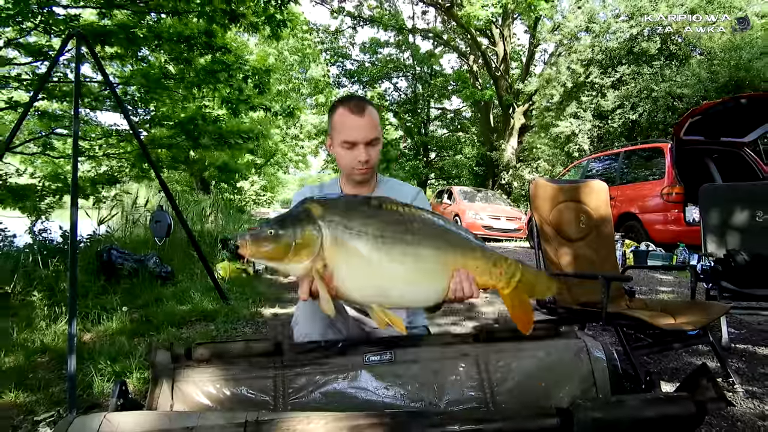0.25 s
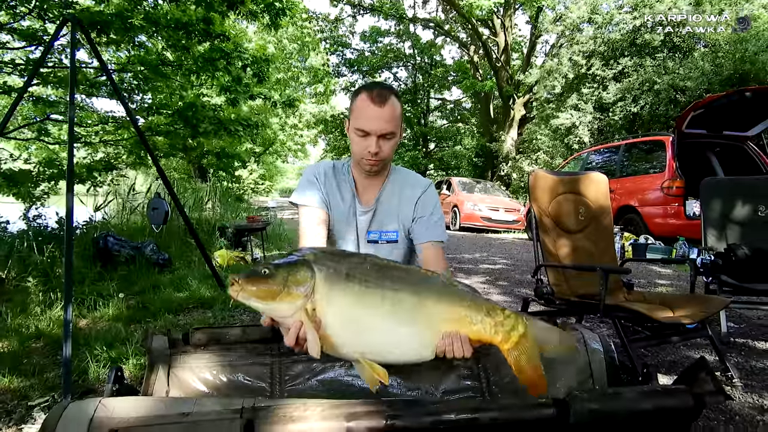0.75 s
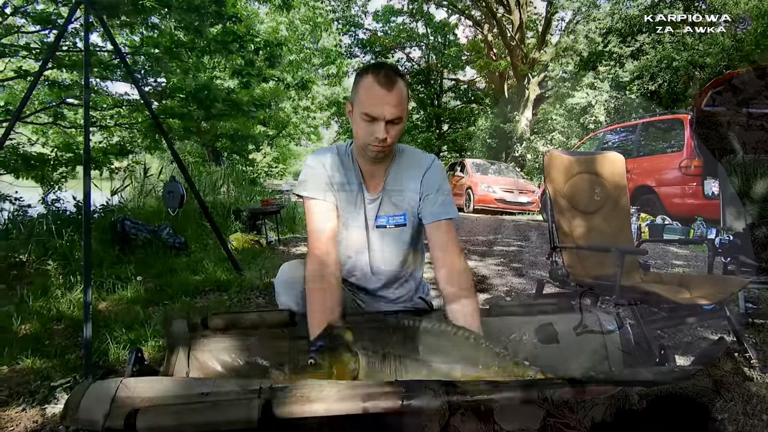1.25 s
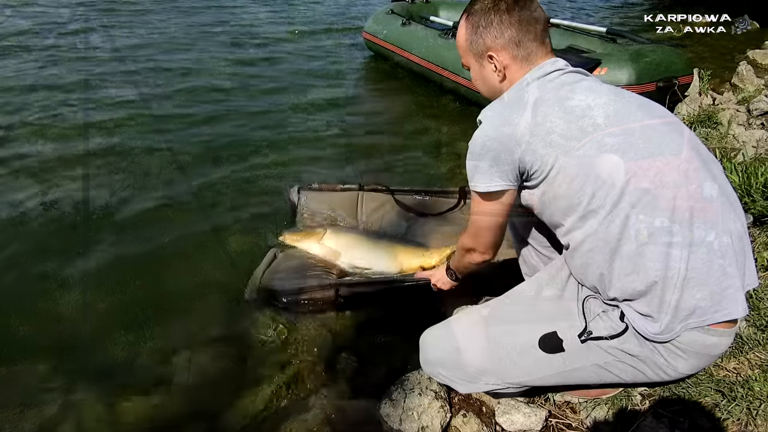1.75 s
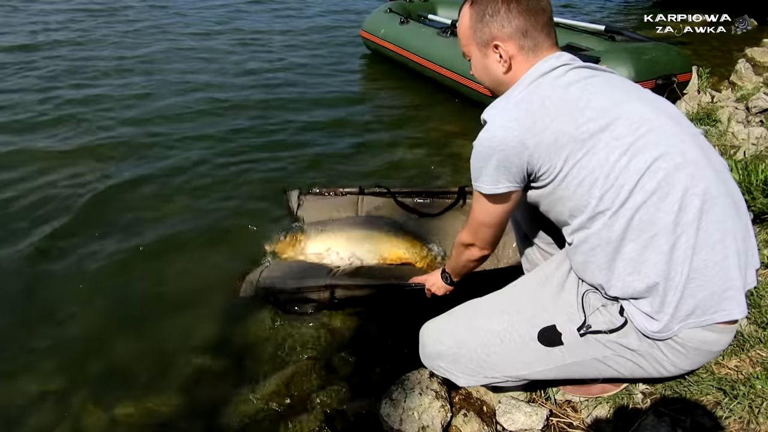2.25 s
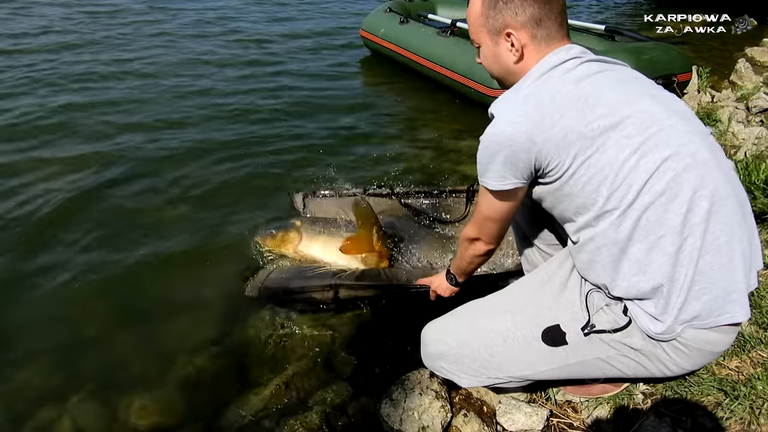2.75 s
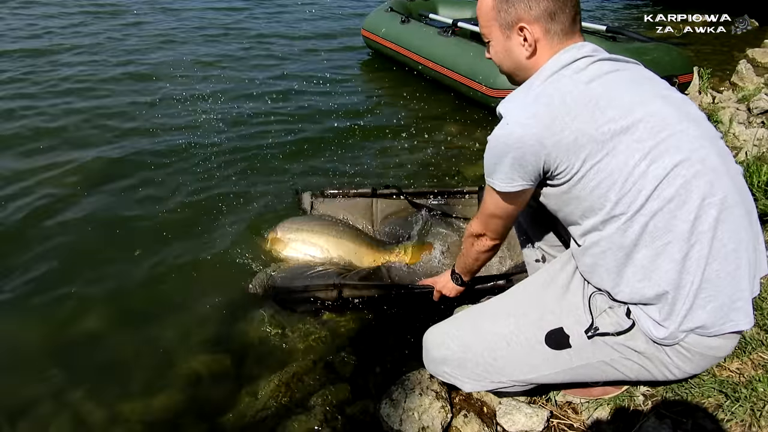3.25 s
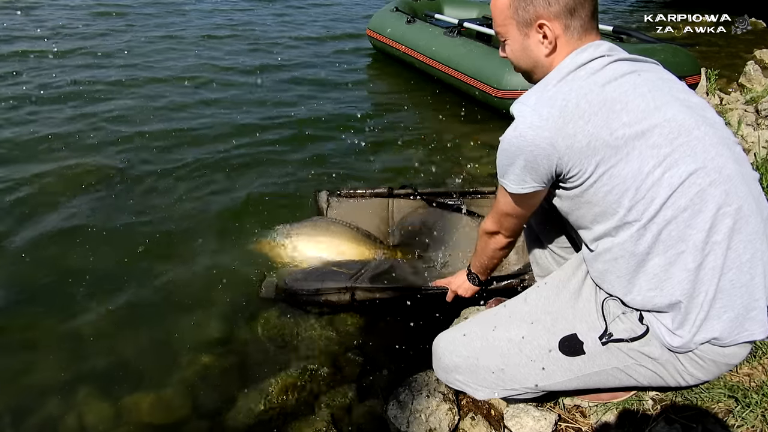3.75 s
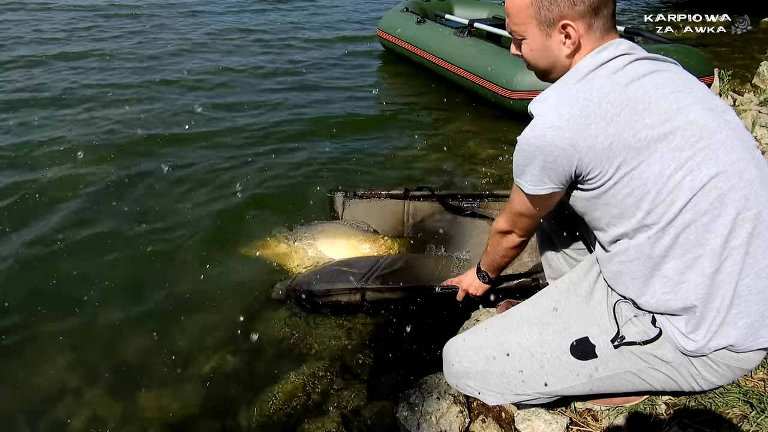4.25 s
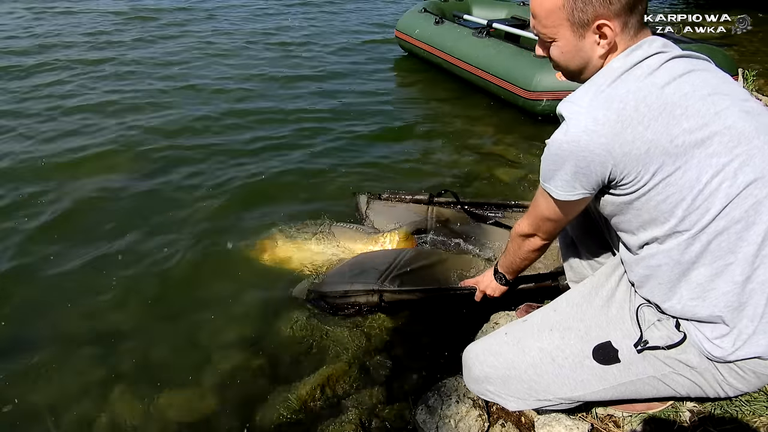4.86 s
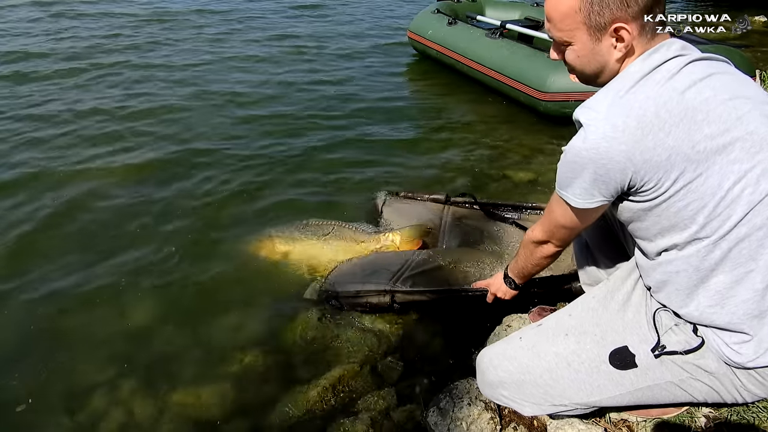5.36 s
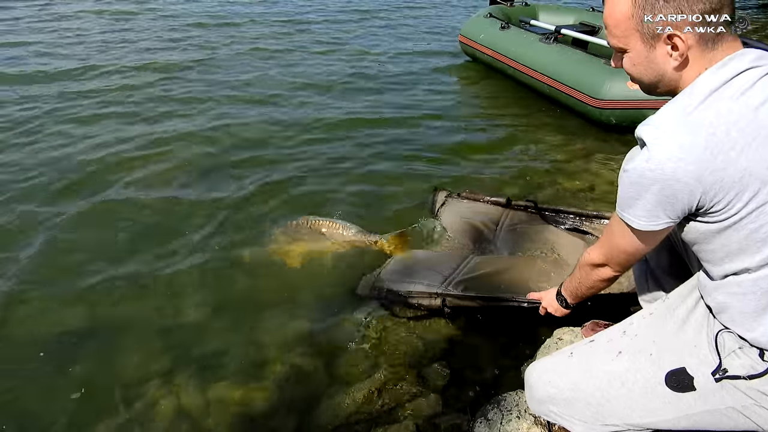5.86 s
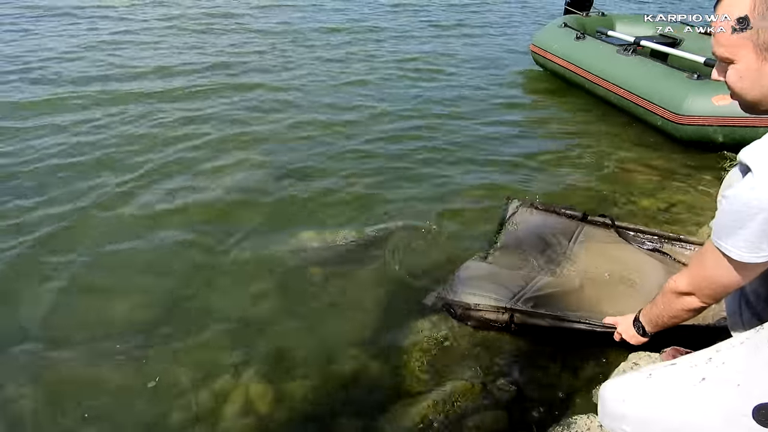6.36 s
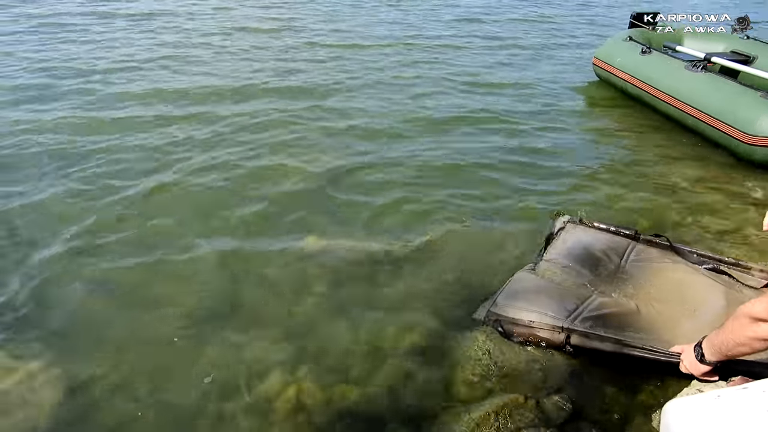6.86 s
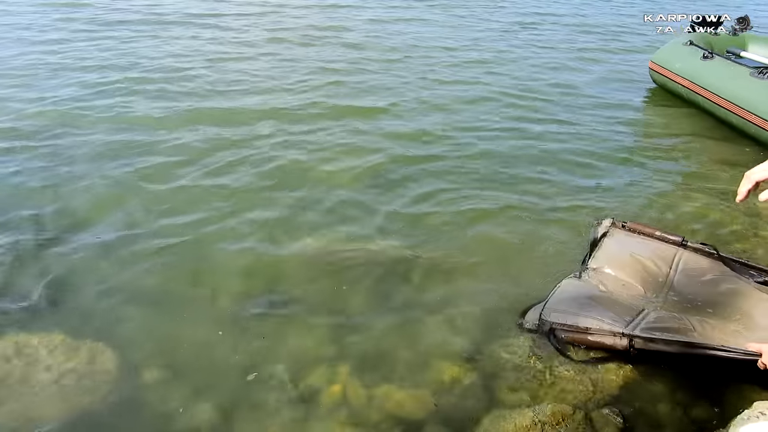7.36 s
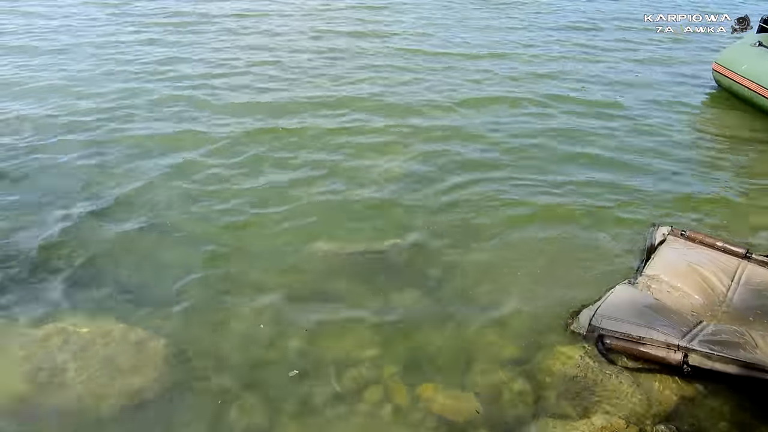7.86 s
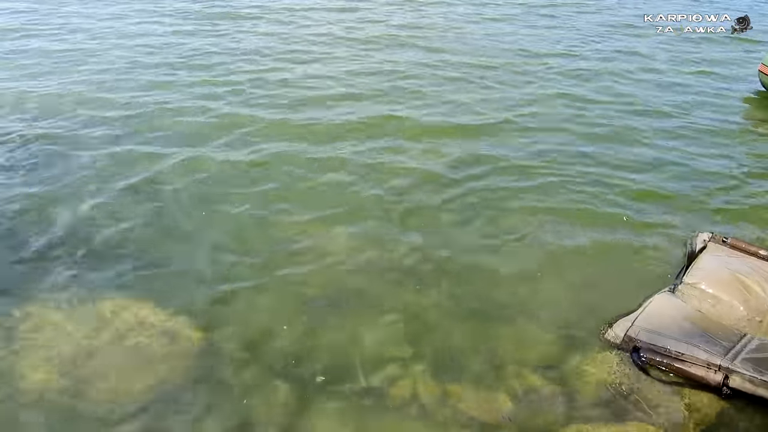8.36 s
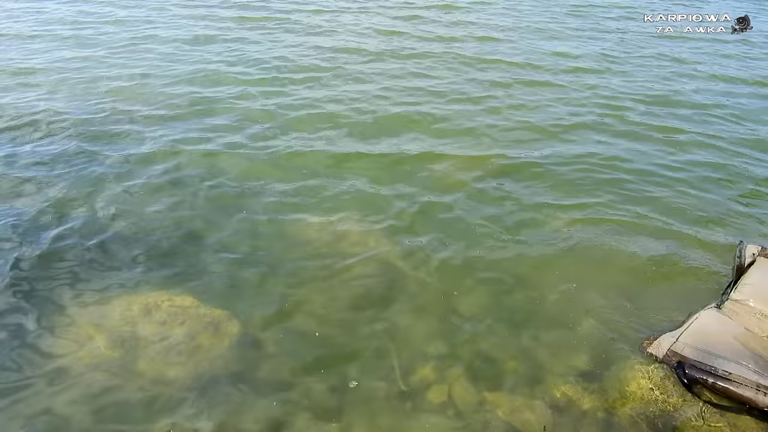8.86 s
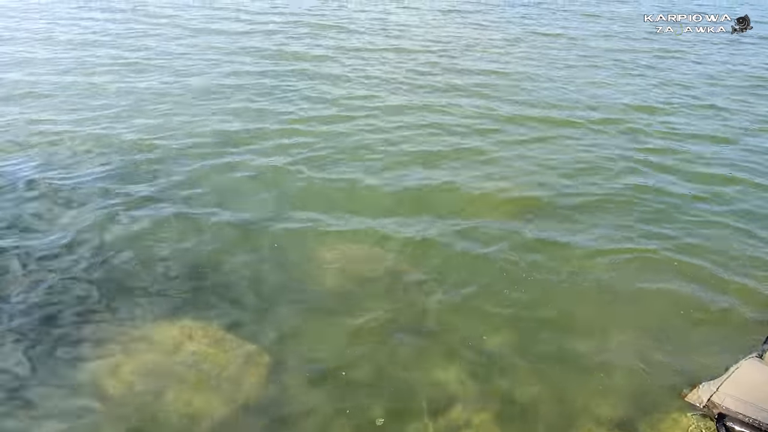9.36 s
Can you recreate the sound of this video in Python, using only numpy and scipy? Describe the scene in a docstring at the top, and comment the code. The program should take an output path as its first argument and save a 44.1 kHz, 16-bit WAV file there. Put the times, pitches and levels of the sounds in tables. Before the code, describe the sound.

Close stereo sound at a leafy lake bank. First come low thuds of handling, faint bird whistles and a distant hum; then hard damped knocks and wet fabric swishing with tiny crackles. A short violent splash follows, sharp slaps over fizzing spray and hollow bubbles, then smaller showers and ticking drops. The water settles; steady soft hiss remains, with occasional dull bumps and a lively run of birdsong toward the end.

```python
"""Soft bumps of a hand-held microphone and a far motor's hum open the scene, among breeze and hissing leaves.
Close by at the edge of a lake, a big carp is lowered onto a wet padded cradle: noise-like grains make the fabric,
ringing modes the frame. It then thrashes in a floating sling: showers of short rising tones make spray, bubbles
and falling drops, and filtered noise the heaved water. Small birds, gliding sines with echoes, whistle in the
trees as it swims off."""
import sys
import numpy as np
from scipy import signal
from scipy.fft import irfft
from scipy.io import wavfile
from scipy.ndimage import uniform_filter1d, map_coordinates

SR = 44100
rng = np.random.default_rng(int(sys.argv[2]) if len(sys.argv) > 2 else 0)


def master(y):
    """Save y as 16-bit WAV."""
    cut = np.clip(np.atleast_2d(y).T, -1, 1)
    pcm = np.round(cut * 32767)  # scale
    wavfile.write(sys.argv[1], SR, pcm.astype(np.int16))


N = 423390
TIME = np.arange(N) / SR
CUTOFF_HZ = 15300   # top of the microphone's sound


def from_db(db):
    """Decibels to gain."""
    return 10 ** (np.asarray(db) / 20)


def rms_one(x):
    """Scale to rms 1."""
    return x / np.sqrt(np.mean(x ** 2) + 1e-20)


def at_hz(points, hz):
    """Read a spectrum on a log-frequency axis."""
    point_hz, value = np.transpose(points)
    return np.interp(np.log(hz), np.log(point_hz), value)


def drift(rate):
    """Smooth random wandering of rms 1, with a new target so many times a second."""
    knots = rng.standard_normal(int(N / SR * rate) + 2)
    return rms_one(np.interp(TIME * rate, np.arange(len(knots)), knots))


def swell(s, half):
    """A rounded rise and fall about one moment, down to 0.35 of its peak at half seconds either side."""
    bell = 1 / (1 + ((TIME - s) / half) ** 2)
    return bell ** 1.5


def together(rows, times):
    """Joint level of (start s, length s, dB) events that build up, hold and settle, exponentially at both ends."""
    t = TIME[::16]
    build_s, settle_s = times
    power = 0
    for start, length, db in rows:
        before = np.maximum(start - t, 0) / build_s
        after = np.maximum(t - start - length, 0) / settle_s
        power = power + from_db(2 * db) * np.exp(-2 * (before + after))
    return np.interp(TIME, t, np.sqrt(power + 1e-18))


# Left-right likeness of the noises. Each row: frequency in Hz, correlation from -1 to 1.
LIKENESS = [(60, 0.77), (150, 0.74), (380, 0.86), (950, 0.75), (2380, 0.55), (5980, -0.025), (15000, -0.69)]


def noise(spectrum):
    """Stereo noise of a given colour, alike at both ears in the bass and opposed at the top; rms 1."""
    hz = np.maximum(np.arange(N // 2 + 1) * SR / N, 1)
    mid, side = rng.standard_normal((2, len(hz))) + 1j * rng.standard_normal((2, len(hz)))
    alike = np.clip(at_hz(LIKENESS, hz), -.99, .99)
    ears = np.sqrt(1 + alike) * mid + np.sqrt(1 - alike) * side * [[1], [-1]]
    bass_cut = hz / np.hypot(hz, 20)
    return rms_one(irfft(ears * from_db(at_hz(spectrum, hz)) * bass_cut, N))


def pings(s, db, hz, cycles, pan_db, rise, skew, size, softness=1.4):
    """Short tones that swell for some cycles, then die, gliding up by rise; skew scales the phase between the ears."""
    step = np.arange(size)
    at = (np.maximum(s * SR, 0).astype(int)[:, None] + step).ravel()
    start = rng.random(len(s))
    apart = skew * np.sqrt(3) * rng.uniform(-0.75, 1, len(s))
    columns = np.float32([from_db(db), from_db(pan_db / 2), hz, cycles, start, apart])
    gain, lean, hz, cycles, start, apart = columns[:, :, None]
    turns = hz * np.float32(step / SR)
    age = turns / cycles   # 1 at the peak
    shape = gain * (age * np.exp(1 - np.minimum(age, 20))) ** softness
    phase = 2 * np.pi * (turns * (1 + rise * np.minimum(age, 6) / 2) + start)
    ears = []
    for ear in (1, -1):
        tones = shape * lean ** ear * np.sin(phase + ear * apart / 2)
        ears.append(np.bincount(at, tones.ravel(), N)[:N])
    return np.array(ears)


CLUMP_WIDTH_HZ, CLUMPS_PER_S = 330, 30   # grains bunch in pitch and in time


def grains(span, spectrum, per_s, cycles, spread_db, clump_db, skew, size):
    """A shower of pings of random pitch and size, bunched into clumps, over a span of time; evened to near 1."""
    start, end = span
    when, pitch, big, length, place = rng.random((int(per_s * (end - start)), 5)).T
    low, high = spectrum[0][0], min(spectrum[-1][0], CUTOFF_HZ)
    s = start + when * (end - start)
    hz = low + (high - low) * pitch
    clump_map = rng.standard_normal(size=(400, 40))
    clump_at = [(s - start) * CLUMPS_PER_S, hz / CLUMP_WIDTH_HZ]
    clumps = map_coordinates(clump_map, clump_at, order=1, mode="mirror")
    db = at_hz(spectrum, hz) + spread_db * np.minimum(-np.log(1 - big), 4.5) + clump_db * clumps
    x = pings(s, db, hz, cycles * 2 ** (2 * length - 1), 8 * (place - .5), 0.016, skew, size)
    power = np.abs(uniform_filter1d(np.mean(x ** 2, axis=0), size=1800))
    return x / np.sqrt(power + .03 * power.mean())


def scatter(x, t60, build_s):
    """Many faint echoes, different at each ear, that build up and die away by 60 dB in t60 seconds."""
    t = np.arange(SR) / SR
    echoes = rng.standard_normal((2, SR)) * from_db(-60 * t / t60) * (1 - np.exp(-t / build_s))
    echoes /= np.sqrt(np.sum(echoes ** 2, axis=1, keepdims=True))
    return signal.fftconvolve(np.atleast_2d(x), echoes, axes=1)[:, :N]


# Far motor. Each row: time in seconds, level in dB.
MOTOR_LEVEL = [(0, -51), (.8, -50.5), (1.2, -40.5), (1.6, -42.5), (1.83, -46.5), (2.0, -74)]
MOTOR_HZ = 123.7   # mean pitch


def motor():
    """A far motor hums as one sine, wavering in pitch and strength."""
    s, db = np.transpose(MOTOR_LEVEL)
    level_db = np.interp(TIME, [s[0] - .05, *s, s[-1] + .05], [-120, *db, -120])
    throb = 1 + 0.42 * np.tanh(drift(34.5))
    hz = MOTOR_HZ * (1 + 0.021 * drift(40.9))
    return from_db(level_db) * throb * np.sin(2 * np.pi * np.cumsum(hz) / SR)


# Colours of the open air and of the leaves. Each row: frequency in Hz, relative level in dB.
SHORE_COLOUR = [(41, -55.5), (70, -28), (96, -27), (110, -4), (128, 3.5), (161, 1.5), (199, 4), (246, -4),
                (353, -0.5), (471, -6), (988, -5), (1110, -6.5), (1320, -6.5), (2270, -12), (2600, -19),
                (3380, -26), (5720, -120)]
LEAF_COLOUR = [(1500, -22), (2500, -2), (3300, 0.5), (3900, -3.5), (4500, 0.5), (6000, -1.5), (7500, -1.5),
               (9000, 2), (9800, -3), (11000, -10.5), (12500, -15), (14000, -31), (15300, -47)]
TO_SHORE = (1.9, 2.7)   # seconds over which the background under the trees fades into that of the open shore
AIR_DB, RUSTLE_DB = (-49.5, -52.5), (-53, -56)   # under the trees, then at the shore


def shore_and_leaves():
    """The wash of the shore and the hiss of leaves, two steady coloured noises."""
    air, rustle = (from_db(np.interp(TIME, TO_SHORE, db)) for db in (AIR_DB, RUSTLE_DB))
    return air * noise(SHORE_COLOUR) + rustle * noise(LEAF_COLOUR)


# Colour of the breeze. Each row: frequency in Hz, relative level in dB.
BREEZE_COLOUR = [(10, -39), (22, -26.5), (40, -12), (58, -2.5), (100, -2.5), (160, -6), (300, -16),
                 (600, -37), (2000, -69)]
# Low rumbles on the microphone, from gusts and from a handling bump at the start.
# Each row: start in seconds, length in seconds, level in dB before the flutter.
RUMBLES = [(0, 0.013, -36.5), (.86, 0.94, -47), (2.1, 0.49, -56), (4.02, 0.52, -61), (8.85, 0.72, -55)]
RUMBLE_TIMES, CALM_DB = (0.04, 0.07), -70.5   # time constants (build s, settle s); level between rumbles


def breeze():
    """Breeze on the microphone, a low fluttering noise that grows in gusts and with a handling bump at the start."""
    level = together(RUMBLES, RUMBLE_TIMES) + from_db(CALM_DB)
    flutter = from_db(3.9 * drift(22))
    return level * flutter * noise(BREEZE_COLOUR) * from_db([[1.5], [-1.5]])


# Bands of noise from high lisps to a faint drone. Each row: time of the peak in seconds, level in dB,
# centre in Hz, width of each filter pass in Hz, half length in seconds.
LISPS = [(0.213, -56, 2560, 447, 0.23), (0.589, -39, 8470, 1100, .014), (1.78, -42, 2700, 900, 0.023),
         (2.062, -49.5, 1620, 260, 0.06), (4.1, -59, 449, 35.2, 0.39), (6.044, -47, 7300, 2000, 0.017),
         (7.49, -44.5, 9150, 4200, 0.011), (8.844, -35, 7400, 1990, 0.003),
         (8.875, -41.5, 7840, 1940, 0.041)]


def lisps():
    """Soft narrow bands of filtered noise that rise and fall."""
    out, white = 0, rng.standard_normal((2, N))
    for s, db, hz, width_hz, half in LISPS:
        band = signal.butter(2, [hz - width_hz / 2, hz + width_hz / 2], "band", fs=SR, output="sos")
        hiss = rms_one(signal.sosfilt(np.vstack([band, band]), white))
        out = out + from_db(db) * swell(s, half) * hiss
    mid, side = out
    return mid + .5 * side * np.array([[1], [-1]])


# Birdsong in the trees. Each row: start in seconds, length in seconds, first pitch in Hz, last pitch in Hz,
# arch of the glide in Hz, trill span in Hz, relative level in dB.
SONG = [(.02, 0.28, 2590, 2550, -70.5, 12, -60.5), (.36, .19, 2520, 2644, -89, 5, -61.5),
        (5.613, 0.1, 2840, 3210, -55, 260, -61), (5.858, 0.041, 5610, 5070, -2, 150, -51),
        (6.6, 0.054, 3060, 3340, 3, 240, -52.5), (6.681, 0.049, 4530, 4720, -7, 72, -41.5),
        (6.71, 0.057, 4890, 4885, 33, 230, -42), (6.814, 0.083, 4080, 3694, 7, 62, -43),
        (6.97, .061, 2890, 2480, -1, 60, -58.5), (7.201, 0.072, 3696, 3367, 16, 130, -40),
        (7.295, .12, 2666, 2996, 19, 20, -52.5), (7.513, 0.17, 2810, 2612, 0, 44, -52.5),
        (7.811, 0.043, 4380, 4250, 62, 170, -39.5), (7.828, 0.049, 3660, 3520, 15, 15, -42),
        (7.935, 0.0765, 3835, 3514, 59, 105, -38.5), (8.053, .04, 2570, 2760, 64, 30, -52.5),
        (8.104, 0.097, 3290, 3160, -3, 21, -43), (8.246, 0.027, 4870, 5150, 50, 160, -47),
        (8.25, .08, 4610, 4400, 35, 222, -40), (8.304, 0.044, 3680, 3530, 6, 130, -52),
        (8.384, 0.094, 3020, 3150, 28, 60, -50), (8.87, 0.045, 3160, 3260, -2, 0, -61),
        (9.033, 0.0081, 3370, 3600, 42, 0, -54)]
TRILL_PER_S = 130   # mean rate


def bird():
    """Whistles that glide along an arch, some with a fast trill; near trees smear them and far ones answer faintly."""
    song, waver = np.zeros(N), drift(330)
    trill = np.sin(2 * np.pi * np.cumsum(TRILL_PER_S * (1 + .15 * drift(30))) / SR)
    for s, length, first_hz, last_hz, arch_hz, trill_hz, db in SONG:
        u = np.linspace(0, 1, int(length * SR))
        at = max(int(s * SR), 0) + np.arange(len(u))
        arch = np.abs(np.sin(np.pi * u))
        glide = first_hz + (last_hz - first_hz) * u + arch_hz * arch
        hz = glide + .5 * trill_hz * trill[at] + (20 + 0.23 * trill_hz) * waver[at]
        song[at] += from_db(db + 6.0) * arch ** .5 * np.sin(2 * np.pi * np.cumsum(hz) / SR)
    near_trees = scatter(song, t60=0.29, build_s=0.01)
    far_trees = from_db(-16) * scatter(song, t60=0.66, build_s=0.041)
    mid, side = near_trees + far_trees
    return from_db(-8.0) * song + mid + .5 * side * np.array([[1], [-1]])


# Soft bumps of handling, at the microphone itself. Each row: time of the peak in seconds, peak in dB,
# pitch in Hz, cycles to the peak, left over right in dB.
BUMPS = [(.011, -19, 230, 2.17, 7), (0.0227, -23.5, 360, 1.8, 12), (.032, -11.5, 173, 1.68, 8),
         (.383, -33, 157, 3.8, 7), (0.46, -27, 192, 2.1, 12), (1.218, -31, 250, 1.2, 13),
         (1.314, -30, 373, 5.4, 16.5), (1.316, -27, 197, 2.06, 12), (1.597, -32.5, 490, 2, 10),
         (1.625, -36, 165, 1.7, 17), (1.677, -25.5, 320, 1.18, 8), (4.165, -42, 67, 2.5, 3),
         (4.355, -42, 452, 5.2, 4.5), (4.416, -42, 400, 3, 1), (4.514, -39, 147, 1.73, 1.5),
         (4.597, -44, 108, 1.3, 8), (5.107, -25, 201, 2.77, -2), (5.291, -37.5, 198, 4, 5),
         (5.927, -36, 176, 2.66, 1), (6.809, -39.5, 160, 4, 11), (7.077, -21.5, 171, 2.25, 3.5),
         (7.142, -25, 163, 2.1, 10), (9.094, -36, 760, 4.9, 9), (9.103, -37, 330, 2.12, 8.5)]


def bumps():
    """Dull thuds of a few cycles each, with a short rumbling tail."""
    s, db, hz, cycles, pan_db = np.transpose(BUMPS)
    thuds = pings(s - cycles / hz, db, hz, cycles, pan_db, rise=0, skew=1.0, size=5000, softness=9.0)
    return thuds + from_db(-4.0) * scatter(thuds, t60=0.17, build_s=0.003)


# Knocks on the cradle's frame. Each row: time in seconds, level in dB, dulling above 1200 Hz in dB per octave
# (a negative one brightens).
KNOCKS = [(0.2078, -22, 25), (0.595, -29.5, 16), (0.961, -24, 26), (1.054, -12, 1.5), (1.21, -28, 12),
          (1.5223, -25, 3), (1.55, -36, -3), (1.717, -44.5, -16.5)]
# Modes of the frame. Each row: frequency in Hz, relative level in dB, time to die by 60 dB in seconds.
FRAME_MODES = [(636, -17, 0.019), (830, -4.5, 0.022), (1023, -2.5, 0.046), (1260, -11.5, .04),
               (1670, -0.5, 0.017), (2230, -4, 0.019), (2520, -7, 0.023), (3160, -7, 0.011)]


def frame():
    """Each knock sets off the frame's damped modes and has its own dulling of the high ones."""
    s, db, dulling = np.transpose(KNOCKS)
    ring = np.zeros(N)
    for k, (hz, mode_db, t60) in enumerate(FRAME_MODES):
        blows = np.full(N, 1e-18)
        dull_db = -dulling * np.maximum(np.log2(hz / 1200), 0)
        blows[(s * SR).astype(int)] = from_db(db + mode_db + dull_db + rng.normal(0, 1.0, len(s)))
        r = from_db(-60 / (t60 * SR))   # decay per sample
        w = 2 * np.pi * hz / SR
        ring += (-1) ** k * signal.lfilter([0, np.sin(w)], [1, -2 * r * np.cos(w), r * r], blows)
    muffled = signal.sosfilt(signal.butter(4, 3400, fs=SR, output="sos"), ring)
    return muffled * from_db([[-2.5], [-9]])


# Colours of wet fabric, bright and dull. Each row: frequency in Hz, relative level in dB.
SWISH_COLOUR = [(1470, -38), (2500, -15), (2970, -12), (3200, -11), (3560, -9), (4200, -6.5), (4910, -1.5),
                (5700, -1.5), (6830, -1.5), (8880, 8.5), (15000, -42)]
CRUMPLE_COLOUR = [(180, -39), (300, -9), (381, -28), (634, -3), (967, 5), (3190, -2.5), (3470, -24),
                  (4000, -31), (5200, -55), (8800, -120)]
# The fish slides over the fabric or thuds down on it.
# Each row: start in seconds, length in seconds, swish in dB, crumple in dB.
FABRIC_CONTACTS = [(0.914, 0.02, -39.5, -56), (1.042, .008, -54, -44), (1.17, 0.04, -54, -49.5),
                   (1.306, 0.051, -41.5, -52), (1.376, 0.054, -43.5, -49.5), (1.534, 0.038, -39.5, -47),
                   (1.578, 0.074, -38, -53), (1.663, 0.023, -35, -49), (1.715, 0.0056, -43, -46),
                   (1.777, .015, -42, -49), (1.836, 0.1, -48, -51)]
CONTACT_TIMES = (0.024, 0.039)   # time constants (build s, settle s)
CONTACT_SPAN = (.75, 2.05)   # from s, to s


def fabric():
    """Wet fabric swishes and crumples under the fish, in dense showers of tiny grains."""
    start, length, swish_db, crumple_db = np.transpose(FABRIC_CONTACTS)
    swish, crumple = (together(zip(start, length, db), CONTACT_TIMES) for db in (swish_db, crumple_db))
    bright = grains(CONTACT_SPAN, SWISH_COLOUR, per_s=12000, cycles=8.6, spread_db=1.7, clump_db=5.0,
                    skew=1.76, size=440)
    dull = grains(CONTACT_SPAN, CRUMPLE_COLOUR, per_s=2500, cycles=2.5, spread_db=0.0, clump_db=3.5,
                  skew=0.72, size=900)
    return swish * bright + crumple * dull


# Wet fabric peels off. Each row: start in seconds, relative level in dB, pitch in Hz.
CRACKLES = [(1.283, -23.5, 9500), (1.4192, -25, 8800), (1.5574, -19.5, 8870), (1.6526, -26, 8260),
            (1.7948, -24, 7760), (1.802, -25.5, 8500)]


def crackles():
    """Short bright snaps as wet fabric lets go."""
    s, db, hz = np.transpose(CRACKLES)
    pan_db = rng.normal(0, 2, len(s))
    snaps = pings(s, db + 3.5, hz, np.full(len(s), 1.6), pan_db, rise=0, skew=0.92, size=300)
    return signal.sosfilt(signal.butter(8, 10200, fs=SR, output="sos"), snaps)


# Strokes of the tail, each building to a peak and settling.
# Each row: time of the peak in seconds, spray in dB, bubbles in dB, heaved water in dB.
STROKES = [(2.16, -42, -63, -39.5), (2.305, -27.5, -26, -44.5), (2.525, -22.5, -25.5, -48)]
# time constants of a stroke: (build s, settle s)
SPRAY_TIMES, BUBBLE_TIMES, HEAVE_TIMES = (0.087, 0.058), (0.065, 0.07), (0.045, 0.085)
# Thrown water falls back. Each row: start in seconds, length in seconds, spray in dB, bubbles in dB.
SHOWERS = [(2.636, 0.25, -39.5, -46), (2.996, 0.077, -37.5, -45.5), (3.215, 0.1, -53.5, -51),
           (3.45, 0.14, -66, -51), (3.67, 0.083, -44, -53.5)]
SHOWER_TIMES = (0.056, 0.061)   # time constants (build s, settle s)


def water_levels():
    """Strength of spray, bubbles and heaved water: the strokes of the tail, then the showers that follow."""
    s, spray_db, bubbles_db, heave_db = np.transpose(STROKES)
    start, length, rain_db, churn_db = np.transpose(SHOWERS)
    no_hold = np.zeros(len(s))
    thrown = together(zip(s, no_hold, spray_db), SPRAY_TIMES)
    falling = together(zip(start, length, rain_db), SHOWER_TIMES)
    trapped = together(zip(s, no_hold, bubbles_db), BUBBLE_TIMES)
    churned = together(zip(start, length, churn_db), SHOWER_TIMES)
    heave = together(zip(s, no_hold, heave_db), HEAVE_TIMES)
    return np.hypot(thrown, falling), np.hypot(trapped, churned), heave


SPLASH_SPAN = (1.9, 4.05)   # from s, to s
# lesser drops and bubbles come at random: rate, level above their water, spread either way, loudest
STRAY_PER_S, STRAY_ABOVE_DB, STRAY_SPREAD_DB, STRAY_LOUDEST_DB = 28, 6, -7, -24


def stray(level, pitches, cycles):
    """Rows of lesser drops at random moments, as strong as the water around them allows."""
    start, end = SPLASH_SPAN
    when, pitch, big = rng.random((int(STRAY_PER_S * (end - start)), 3)).T
    s = start + when * (end - start)
    water_db = 20 * np.log10(np.interp(s, TIME, level) + 1e-9)
    db = np.minimum(water_db + STRAY_ABOVE_DB + STRAY_SPREAD_DB * (2 * big - 1), STRAY_LOUDEST_DB)
    return np.transpose([s, db, np.interp(pitch, [0, 1], pitches), np.full(len(s), cycles)])


# The loudest drops and bubbles. Each row: start in seconds, ring peak in dB before the treble cut,
# pitch in Hz, cycles to the peak.
DROPS = [(1.887, -31.5, 1327, 4.7), (2.003, -44, 7000, .7), (2.037, -32, 8800, 2.8),
         (2.051, -15.5, 8900, 3.1), (2.0545, -24, 8490, 1.1), (2.1541, -15, 8260, 1.5),
         (2.1962, -14, 9000, 2.2), (2.2162, -21, 5300, 1.5), (2.26, -26, 1860, 5.6),
         (2.2815, -20.5, 3160, 5), (2.283, -22, 1830, 5.7), (2.307, -18, 2270, 3.6),
         (2.336, -5.5, 8900, 2.6), (2.3627, -14, 6700, 1.8), (2.3755, -22, 2200, 3.1),
         (2.3883, -13.5, 6500, 1.2), (2.4282, -9.5, 8750, 2.8), (2.438, -21, 3960, 2.2),
         (2.4537, -28, 1500, 2.5), (2.4643, -21.5, 2690, 2.6), (2.474, -31, 1400, 3.2),
         (2.4825, -15, 4750, 1.8), (2.5132, -14.5, 3770, 1.5), (2.523, -17, 1980, 1.8),
         (2.5272, -15.5, 3400, 3.4), (2.5282, -12, 8900, 1), (2.5808, -25, 3630, 3.6),
         (2.635, -31, 1300, 2.7), (2.725, -28, 2230, 5.5), (2.7645, -14, 6700, 1.4),
         (2.785, -28.5, 2320, 3.6), (2.8013, -20, 9200, 2), (2.8399, -25, 4400, 1.3),
         (2.852, -31, 5200, 1.2), (2.862, -23, 9300, 1.7), (2.9456, -19, 8760, 1.8),
         (2.952, -20, 9000, 1.8), (2.9715, -19, 8700, 1.5), (2.9974, -20, 4260, 3.1),
         (3.0019, -8.5, 7750, 1.2), (3.003, -29, 1520, 5.1), (3.0378, -14.5, 7480, 1.7),
         (3.0543, -19.5, 4900, 1.9), (3.0543, -20.5, 2440, 1.7), (3.07, -26, 2510, 1.4),
         (3.081, -20, 5600, 2.7), (3.0885, -24, 5170, 5.4), (3.447, -44, 2230, 10),
         (3.4674, -30.5, 7470, 12), (3.492, -40, 2100, 4.8), (3.518, -25, 800, 2.7),
         (3.6178, -25.5, 8950, 7.3), (3.6375, -25, 8740, 2.6), (3.6762, -14, 8740, 2.4),
         (3.679, -19, 8740, 2), (3.7, -37, 5740, 7), (3.7431, -19, 8900, 2.8), (3.764, -18, 8560, 3.3),
         (3.7711, -12, 8840, 2.3), (3.8224, -20, 9000, 2.3), (7.389, -33, 3000, 1.2),
         (9.489, -30.5, 5500, 0.43), (9.571, -28.5, 8000, 0.49)]
TICK_HZ, TICK_CYCLES = (5400, 9400), 1.7   # drops on the surface: pitch range, cycles to the peak
PLINK_HZ, PLINK_CYCLES, PLINK_DB = (1700, 2900), 4, -18   # trapped bubbles: likewise, and level against their water
CRACK_HZ, CRACK_CYCLES, CRACK_DB = 5150, 0.21, -12   # first contact of a drop, level against its ring


def drops(spray, bubbles):
    """A drop cracks and ticks on the surface; a trapped bubble rings lower and longer, rising in pitch."""
    ticks = stray(spray, TICK_HZ, TICK_CYCLES)
    plinks = stray(bubbles * from_db(PLINK_DB), PLINK_HZ, PLINK_CYCLES)
    s, db, hz, cycles = np.vstack([DROPS, ticks, plinks]).T
    pan_db, each = rng.normal(0, 1.0, len(s)), np.ones(len(s))
    rings = pings(s, db, hz, cycles, pan_db, rise=0.0039, skew=0.86, size=2000)
    crack_db = db + CRACK_DB + 12 * np.minimum(np.log2(hz / CRACK_HZ), 0)   # large bubbles start softly
    cracks = pings(s, crack_db, CRACK_HZ * each, CRACK_CYCLES * each, pan_db, rise=0, skew=0.6, size=100)
    return signal.sosfilt(signal.butter(8, 10200, fs=SR, output="sos"), rings + cracks)


# Air pockets that close under the tail. Each row: start in seconds, peak in dB, pitch in Hz, cycles to the peak.
GULPS = [(2.155, -30, 348, 1.5), (2.251, -33, 840, 2.6), (2.288, -26, 800, 2.3), (2.288, -35, 320, 3),
         (2.303, -32, 248, 1.3), (2.305, -28, 740, 2.6), (2.324, -29.5, 790, 2.1), (2.352, -45, 860, 2.5),
         (2.524, -27, 960, 3.4), (2.526, -33.5, 214, 1.4), (2.535, -34, 850, 5.4), (2.571, -40, 355, 1.6),
         (2.622, -36.5, 740, 3)]


def gulps():
    """Pockets of air close under the tail and ring low for a few cycles, rising as they shrink."""
    s, db, hz, cycles = np.transpose(GULPS)
    return pings(s, db, hz, cycles, np.zeros(len(s)), rise=0.0058, skew=0.6, size=3500)


# The water-filled hollow of the sling. Each row: resonance in Hz, width in Hz, level in dB.
HOLLOW_MODES = [(835, 41, -10), (1500, 80, -8.5), (1910, 60, -1), (2300, 78, -7), (2660, 98, 0),
                (3460, 90, -4)]


def hollow(x):
    """Narrow resonances of the sling that ring on after the water that excites them."""
    ring = 0
    for hz, width_hz, db in HOLLOW_MODES:
        b, a = signal.iirpeak(hz, hz / width_hz, fs=SR)
        ring = ring + from_db(db) * signal.lfilter(b, a, x + 1e-18)
    return ring


# Colours of spray, bubbles and heaved water. Each row: frequency in Hz, relative level in dB.
SPRAY_COLOUR = [(2400, -35), (3300, -15), (4000, -10.5), (5000, -6), (6000, -6.5), (7200, -1.5),
                (7900, -0.5), (8900, 5), (9600, -3), (10300, -11), (11200, -19), (13000, -22), (15300, -56)]
BUBBLE_COLOUR = [(450, -35), (650, -27), (830, -10.5), (1100, -7.5), (1450, -4.5), (1950, -1.5), (2350, 3),
                 (2900, -8), (3500, -14), (4500, -15)]
HEAVE_COLOUR = [(60, -19), (120, 3), (220, -1), (340, 14.5), (480, -5), (800, 9), (1400, -39), (3000, -82)]
# Slaps of the tail and of falling clumps of water.
# Each row: time of the peak in seconds, spray in dB, bubbles in dB, half length in seconds.
SLAPS = [(2.2845, -37, -17, 0.0014), (2.315, -32, -32, .0078), (2.483, -38, -50, .0012),
         (2.493, -23, -50, .0014), (2.4975, -18, -50, .0014), (2.502, -16, -38, 0.001),
         (2.5213, -10, -26, 0.0012), (2.5278, -12, -32, .0008), (2.521, -16.5, -28, 0.011),
         (2.582, -28, -40, .0025), (2.767, -29, -48, .0012), (2.786, -31, -41, 0.007),
         (2.844, -31, -48, 0.0038), (3.001, -21.5, -41, 0.0017), (3.053, -26, -34, .001),
         (3.296, -43.5, -44.5, 0.0059), (3.683, -33, -60, 0.012), (3.82, -38.5, -56, 0.0024)]


def splash(spray, bubbles, heave):
    """The tail throws clumps of spray, traps ringing bubbles in foam and heaves the water; each blow is a surge."""
    for s, spray_db, bubbles_db, half in SLAPS:
        surge = swell(s, half)
        spray = np.hypot(spray, from_db(spray_db) * surge)
        bubbles = np.hypot(bubbles, from_db(bubbles_db) * surge)
    ringing = grains(SPLASH_SPAN, BUBBLE_COLOUR, per_s=600, cycles=5.7, spread_db=3.5, clump_db=7.0,
                     skew=0.62, size=2000)
    foam = grains(SPLASH_SPAN, BUBBLE_COLOUR, per_s=4000, cycles=0.99, spread_db=0.0, clump_db=-1.0,
                  skew=0.36, size=400)
    droplets = grains(SPLASH_SPAN, SPRAY_COLOUR, per_s=11000, cycles=2.9, spread_db=0.4, clump_db=4.0,
                      skew=1.0, size=340)
    churn = spray * droplets + bubbles * (0.36 * ringing + 0.54 * foam)
    return churn + hollow(churn) + heave * noise(HEAVE_COLOUR)


def scene():
    """Near sounds bounce once off the sling and come back faintly from the stones of the bank."""
    spray, bubbles, heave = water_levels()
    water = splash(spray, bubbles, heave) + gulps() + drops(spray, bubbles)
    near = water + fabric() + frame() + crackles()
    bounce = from_db(-12) * np.pad(near, ((0, 0), (int(.0035 * SR), 0)))[:, :N]
    bank = from_db(-13) * scatter(near, t60=.2, build_s=.002)
    outdoors = breeze() + shore_and_leaves() + motor()
    return near + bounce + bank + bumps() + bird() + lisps() + outdoors


def record(dry):
    """The highest peaks are rounded and the top is cut steeply."""
    rounded = dry / (1 + (dry / .8) ** 4) ** .25
    return signal.sosfilt(signal.ellip(10, .2, 80, CUTOFF_HZ, fs=SR, output="sos"), rounded)


dry = scene()
out = record(dry)
master(out)
```